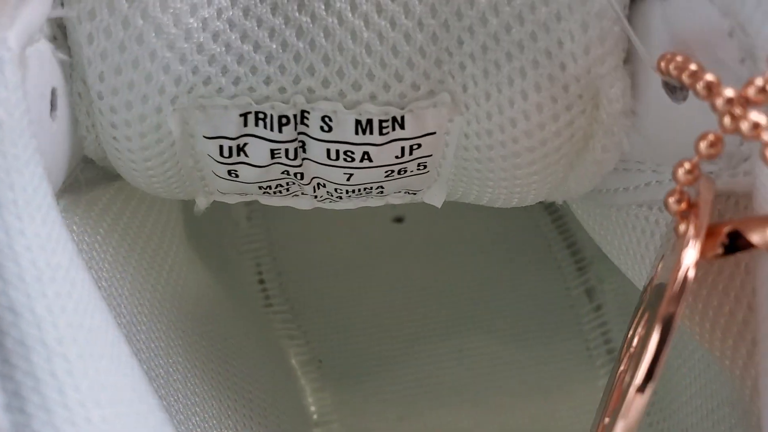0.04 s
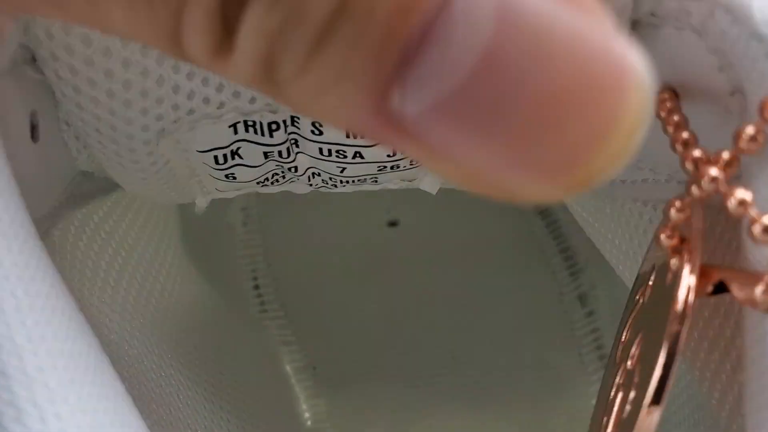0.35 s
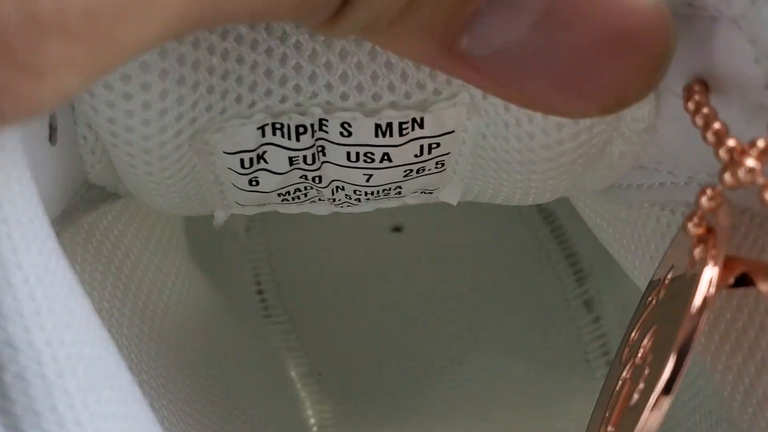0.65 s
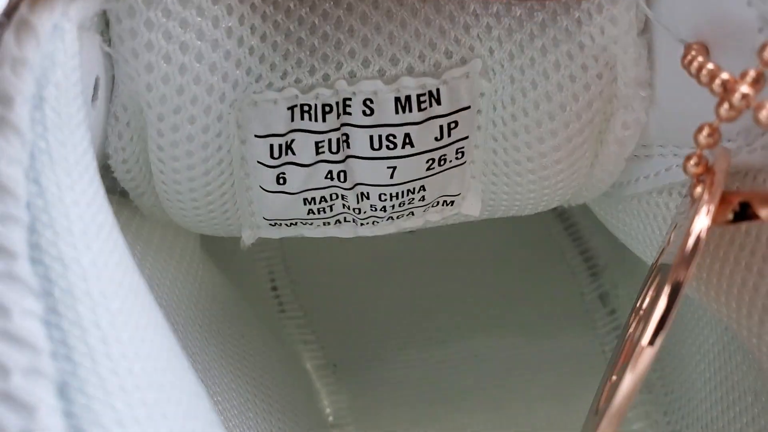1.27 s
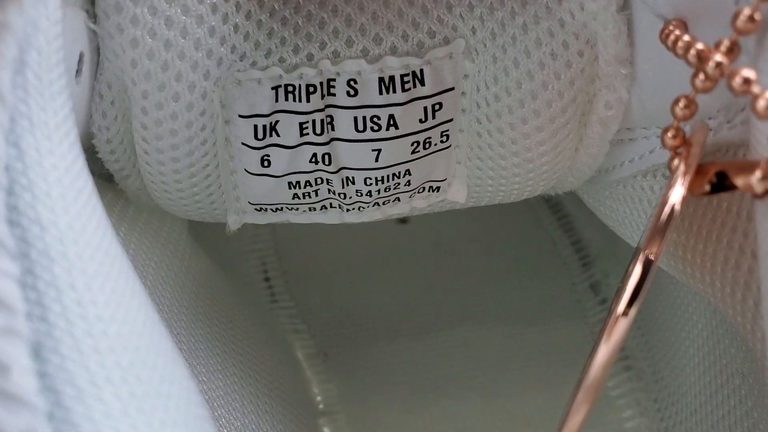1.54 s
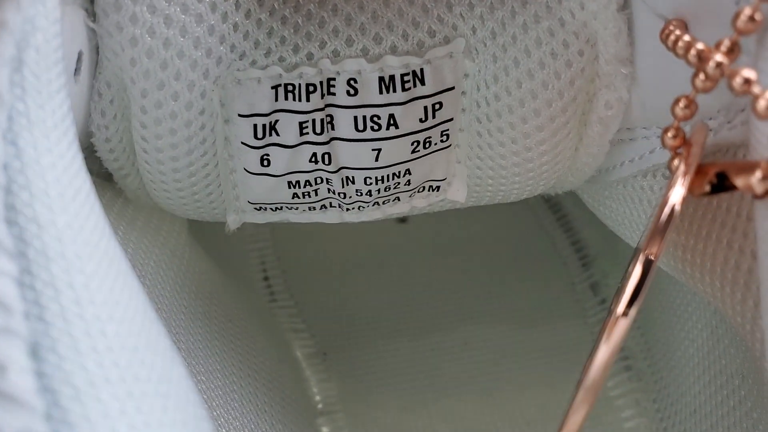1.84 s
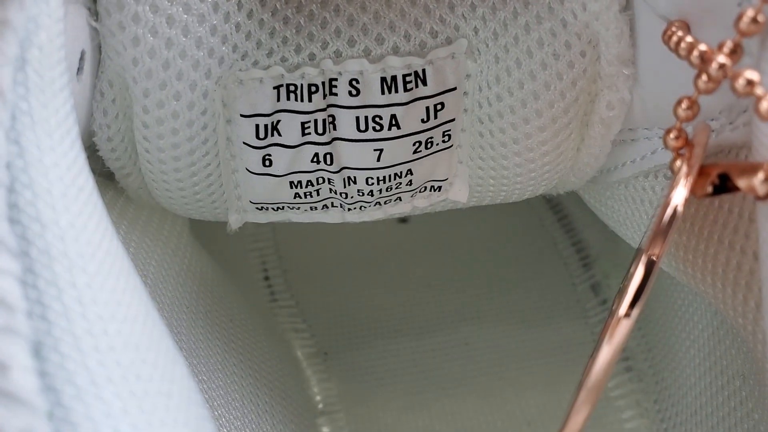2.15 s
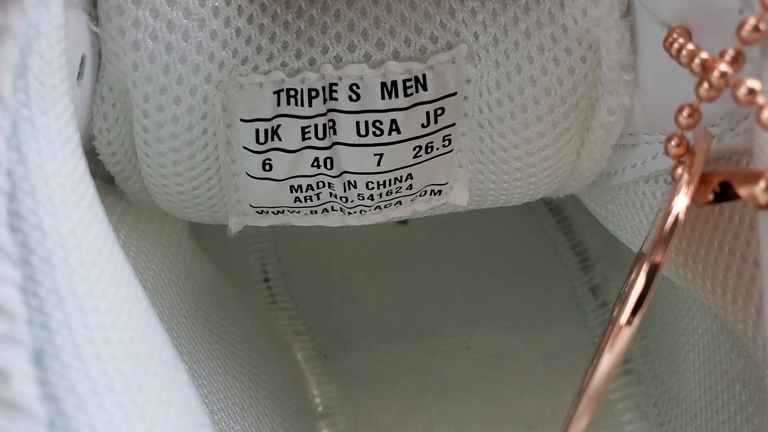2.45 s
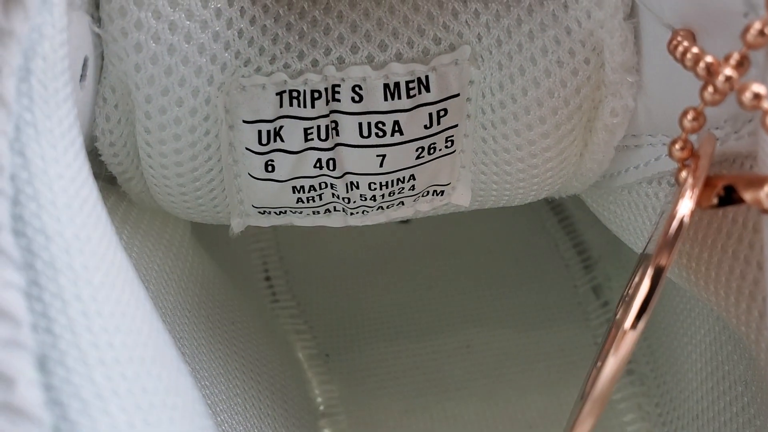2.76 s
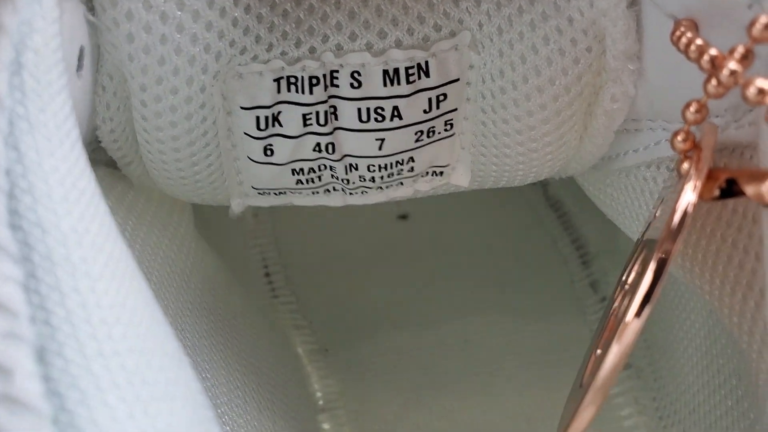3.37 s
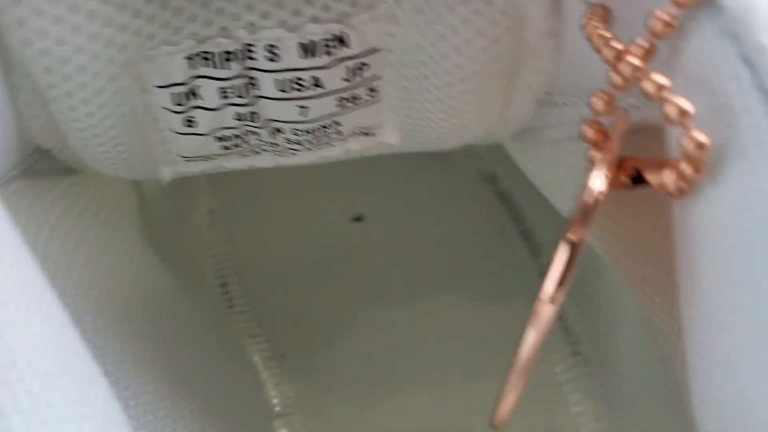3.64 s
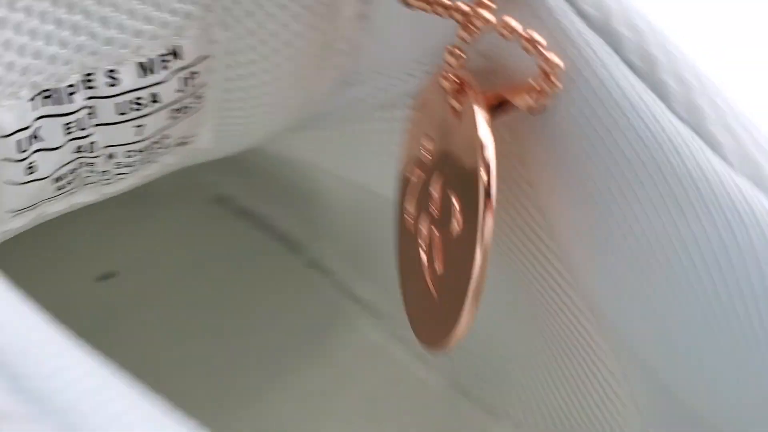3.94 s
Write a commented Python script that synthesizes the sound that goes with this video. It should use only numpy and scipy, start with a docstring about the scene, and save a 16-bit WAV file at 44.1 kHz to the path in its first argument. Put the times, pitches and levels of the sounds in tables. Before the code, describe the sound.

A fabric trainer rubs and rustles unevenly right beside the microphone, hissy over a low handling rumble. In the first second, fingers tap on the left and zip across mesh. After a lull near 1.6 seconds the strokes return, with a dull thud at 2.2. The strongest stroke comes at 3.4 with deep thuds, and another starts near 4. The quiet room hums faintly.

```python
"""A quiet room with a faint hum; a fabric trainer is turned right next to a hand-held camera's stereo mics.
From the start cloth slides in uneven strokes: a hiss of catching fibres over a dull rub and low rumble.
In the first second fingers tap the camera body by the left mic, and a finger zips across the mesh.
After a lull near 1.6 s the strokes return; a shift of the grip thuds at 2.2 s and fainter zips follow.
The strongest stroke comes at 3.4 s, with deep thuds from the grip, and a last one starts near 4 s."""
import sys
import numpy as np
from scipy import signal
from scipy.fft import rfft, irfft
from scipy.io import wavfile
from scipy.ndimage import uniform_filter1d

SR = 44100
rng = np.random.default_rng(int(sys.argv[2]) if len(sys.argv) > 2 else 0)


def unload_audio(sound):
    """Save the sound as a 16-bit wav file, at the path given as the first command line argument."""
    columns = np.transpose(np.atleast_2d(sound))
    # keep every value between -1 and 1, then stretch to whole-number steps
    steps = np.round(np.clip(columns, -1, 1) * 32767)
    wavfile.write(sys.argv[1], SR, steps.astype(np.int16))


N = 176400
T = np.arange(N) / SR


def amp(db):
    """Decibels to gain."""
    return 10 ** (np.asarray(db) / 20)


def unit(x):
    """Scales to rms 1."""
    return x / np.sqrt(np.mean(x ** 2) + 1e-20)


def db_at(spectrum, hz):
    """Reads a spectrum on a log-frequency axis."""
    freq_hz, level_db = np.transpose(spectrum)
    return np.interp(np.log(hz + 1), np.log(freq_hz + 1), level_db)


def colour(x, spectrum):
    """Gives x a spectrum, at rms 1."""
    gain = amp(db_at(spectrum, np.fft.rfftfreq(N, 1 / SR)))
    return unit(irfft(rfft(x) * gain, N))


def stereo_noise(correlation):
    """White noise at the left and right mics."""
    left, other = rng.standard_normal((2, N))
    return np.array([left, correlation * left + np.sqrt(1 - correlation ** 2) * other])


def wander(rate_hz):
    """Random drift of rms 1, mostly slower than rate_hz."""
    rolloff = 1 + (np.fft.rfftfreq(N, 1 / SR) / rate_hz) ** 4
    return unit(irfft(rfft(rng.standard_normal(N)) / rolloff, N))


def swell(peak_s, rise_s, hold_s, fade_s):
    """Climbs 20 dB in the rise_s before peak_s, rounds off, holds, then falls 20 dB per fade_s."""
    t = T - peak_s
    rising = (np.maximum(-t, 0) / rise_s) ** 1.5
    fading = np.maximum(t - hold_s, 0) / fade_s
    return amp(-20 * np.minimum(rising + fading, 10))


# Room tone: freq_hz, density_db
ROOM_SPECTRUM = [(20, -20), (60, 0), (120, -11), (250, -10), (450, -24.5), (1100, -27.5), (3000, -38.5),
                 (5500, -38), (8000, -44.5), (16000, -48.5)]
# Hum, equal at both mics: pitch_hz, level_db
HUM_TONES = [(60, -60), (240, -75), (1122, -90)]
def room_tone():
    """Still air in a quiet room, and a faint electrical hum."""
    hum = sum(amp(db) * np.sin(2 * np.pi * (hz * T + rng.random())) for hz, db in HUM_TONES)
    air = amp(-68) * colour(stereo_noise(correlation=.7), ROOM_SPECTRUM)
    return air + np.sqrt(2) * hum


# Handling rumble in the camera body: freq_hz, density_db
RUMBLE_SPECTRUM = [(15, -45), (35, -23), (55, -2), (82, 0), (110, -9), (150, -17), (240, -19), (450, -32),
                   (1500, -55), (16000, -80)]
def hand_rumble(rub_db):
    """The moving hand shakes the camera, rising and falling with the rub but less steeply."""
    usual_rub_db = -48
    level_db = -54.5 + .6 * (rub_db - usual_rub_db)
    return colour(stereo_noise(correlation=.75), RUMBLE_SPECTRUM) * amp(level_db)


# Thuds through the camera body, equal at both mics: peak_s, pitch_hz, level_db, rise_s, t60_s
GRIP_SHIFTS = [(.172, 70, -39, .03, .1), (.258, 262, -47, .02, .28), (.565, 56, -35.5, .015, .12),
               (1.105, 72, -45, .02, .1), (1.28, 68, -43, .03, .5), (1.265, 182, -44, .03, .35),
               (1.495, 64, -47, .02, .15), (2.212, 185, -27.5, .012, .1), (2.209, 265, -37, .008, .16),
               (2.225, 82, -41, .04, .4), (2.253, 160, -39, .012, .2), (2.397, 248, -40.5, .015, .28),
               (3.415, 235, -37, .03, .25), (3.476, 84, -27.5, .025, .52), (3.5, 60, -32, .025, .4),
               (3.62, 64, -36, .025, .27)]
def grip_thuds():
    """Each shift of the grip swells into a low, uneven ring."""
    out = np.zeros(N)
    for peak_s, pitch_hz, level_db, rise_s, t60_s in GRIP_SHIFTS:
        ring = np.sin(2 * np.pi * pitch_hz * (T - peak_s))
        rattle = 1 + .25 * wander(rate_hz=60)
        out += amp(level_db) * swell(peak_s, rise_s, 0, t60_s / 3) * ring * rattle
    return out


# Taps right beside the left mic: start_s, level_db, t60_ratio, attack_s
FINGER_TAPS = [(.5525, -23, .9, .003), (.5655, -23.5, 1.1, .001), (.8615, -27, .35, .001)]
# Modes of the camera case: pitch_hz, level_db, t60_s
CASE_MODES = [(185, -6, .05), (290, -1, .05), (420, -3, .04), (540, -14, .03), (980, -17, .02)]
def finger_taps():
    """Soft fingertips knock the damped modes of the camera case."""
    out = np.zeros(N)
    for start_s, level_db, t60_ratio, attack_s in FINGER_TAPS:
        t = np.maximum(T - start_s, 0)
        attack = 1 - np.exp(-t / attack_s)
        for pitch_hz, mode_db, t60_s in CASE_MODES:
            decay = amp(-60 * np.minimum(t / (t60_s * t60_ratio), 10))
            out += amp(level_db + mode_db) * attack * decay * np.sin(2 * np.pi * pitch_hz * t)
    return out * amp([[0], [-9]])  # weaker at the right mic


# Short zips close to the mics: peak_s, rise_s, hold_s, fade_s, level_db
MESH_SKIMS = [(.585, .015, .02, .06, -54), (.7, .008, .008, .04, -53), (1.078, .012, .018, .07, -50),
              (2.58, .008, .012, .04, -63), (2.665, .015, .015, .05, -61), (2.788, .015, .012, .05, -55)]
# Resonances of the shoe's mesh: freq_hz, density_db
MESH_SPECTRUM = [(1000, -40), (4500, -16), (5800, 0), (7500, -13), (9000, -9), (10400, 1), (12500, -9),
                 (16000, -13)]
def mesh_zips():
    """A finger skims the mesh and makes it hiss in two high resonances."""
    envelope = sum(amp(level_db) * swell(*timing) for *timing, level_db in MESH_SKIMS)
    return colour(stereo_noise(correlation=-.08), MESH_SPECTRUM) * envelope


# Dull rub of the padded shoe, close up: freq_hz, density_db
RUB_SPECTRUM = [(30, -26), (120, -9), (178, 0), (245, 2.5), (345, -9), (420, -5.5), (600, -8.5),
                (720, -6.5), (850, -11), (1120, -12), (1500, -22), (4000, -38), (16000, -60)]
def padded_rub(rub_db):
    """Slipping fibres heard through the padding, dull and nearly alike at both mics."""
    sides_db = np.array([[1.3], [-1.3]])  # a little to the left
    return colour(stereo_noise(correlation=.85), RUB_SPECTRUM) * amp(rub_db - 5.6 + sides_db)


# Fibre hiss, close up: freq_hz, density_db
HISS_SPECTRUM = [(100, -25), (400, -7.5), (1000, -1.8), (1400, -1), (2000, -.7), (2800, .6), (4000, .2),
                 (5200, -4.3), (7000, -8.8), (8500, -8.3), (10200, -3.8), (12000, -8.8), (15500, -11)]
# Its balance between the mics: freq_hz, left_minus_right_db
HISS_PAN = [(60, -2.0), (92, -2.5), (140, 0.0), (210, 0.5), (330, 1.0), (500, 2.0), (770, 3.0), (1170, 2.5),
            (1790, 1.5), (2740, 0.5), (4190, -0.5), (6410, 4.0), (9810, -2.5), (15000, -1.0)]
def fibre_hiss(stroke_db, tilt_db_per_octave, snags_per_s=1500, pivot_hz=4000):
    """Countless tiny slips and a few larger snags, in drifting patches of colour."""
    snag_onsets = rng.random(N) < snags_per_s / SR
    snags = snag_onsets * amp(2.5 * np.minimum(rng.exponential(1, N), 4))
    slips = stereo_noise(correlation=-.08) + amp(-9.5) * unit(snags * rng.standard_normal((2, N)))
    frames = dict(fs=SR, nperseg=512, noverlap=384)
    hz, frame_s, spectra = signal.stft(colour(slips, HISS_SPECTRUM), **frames)
    patches = rng.standard_normal(spectra.shape[1:])
    for axis in (0, 1):  # smooth over frequency, then time
        patches = uniform_filter1d(patches, size=12, axis=axis)
    octaves = np.log2(np.maximum(hz, 500) / pivot_hz)[:, None]
    tilt_db = octaves * np.interp(frame_s, T, tilt_db_per_octave)
    sides_db = np.array([.5, -.5])[:, None, None] * db_at(HISS_PAN, hz)[:, None]
    _, hiss = signal.istft(spectra * amp(tilt_db + 1.3 * unit(patches) + sides_db), **frames)
    flutter_db = .8 * wander(rate_hz=70)
    return hiss[:, :N] * amp(stroke_db + 3 + flutter_db)


# Strokes of cloth right at the mics:
# peak_s, rise_s, hold_s, fade_s, level_db, tilt_db_per_octave, rub_offset_db
CLOTH_STROKES = [(0.015, 0.03, 0.024, 0.101, -57.9, -1.1, -7.9),
                 (0.161, 0.048, 0.098, 0.103, -67.8, 0.2, 11.3),
                 (0.29, 0.056, 0.062, 0.187, -44.0, 0.4, 2.7),
                 (0.352, 0.054, 0.015, 0.091, -40.8, 1.5, -4.8),
                 (0.499, 0.06, 0.125, 0.119, -50.4, 0.4, 3.0),
                 (0.701, 0.021, 0.075, 0.221, -51.5, 1.8, -0.5),
                 (0.868, 0.257, 0.057, 0.319, -54.8, -2.7, 3.8),
                 (0.972, 0.048, 0.025, 0.127, -51.8, -0.1, -2.3),
                 (1.09, 0.092, 0.027, 0.103, -58.5, -0.0, 5.5),
                 (1.192, 0.071, 0.036, 0.151, -48.5, -1.1, 0.8),
                 (1.251, 0.027, 0.03, 0.15, -42.2, -0.7, 2.0),
                 (1.414, 0.127, 0.045, 0.104, -58.6, -0.9, 4.1),
                 (1.636, 0.018, 0.029, 0.075, -78.2, -1.9, -1.3),
                 (1.72, 0.015, 0.024, 0.101, -48.0, -0.3, -8.8),
                 (1.764, 0.037, 0.022, 0.124, -36.2, -0.2, -5.9),
                 (1.851, 0.046, 0.029, 0.129, -44.3, -0.9, -5.7),
                 (1.986, 0.029, 0.049, 0.314, -50.5, -0.3, -3.0),
                 (2.189, 0.095, 0.076, 0.139, -45.3, -0.3, 1.8),
                 (2.392, 0.039, 0.014, 0.183, -53.4, 0.6, 4.5),
                 (2.588, 0.047, 0.072, 0.206, -61.7, -0.5, -2.3),
                 (2.721, 0.078, 0.073, 0.14, -47.8, -0.2, -2.8),
                 (2.867, 0.033, 0.068, 0.207, -51.8, 0.6, -2.9),
                 (3.008, 0.087, 0.087, 0.166, -37.1, 0.2, 1.8),
                 (3.239, 0.134, 0.024, 0.396, -48.1, 0.5, 1.4),
                 (3.425, 0.055, 0.035, 0.109, -31.7, 0.5, 2.5),
                 (3.556, 0.068, 0.024, 0.249, -45.1, -0.5, 2.1),
                 (3.696, 0.034, 0.126, 0.057, -54.3, -1.4, 0.3),
                 (3.966, 0.045, 0.05, 0.15, -42.2, 2.0, -3.8)]
def cloth_strokes():
    """Overlapping slides add in power, giving the stroke level, treble tilt and rub level over time."""
    power = np.array([(amp(db) * swell(*timing)) ** 2 for *timing, db, _, _ in CLOTH_STROKES]) + 1e-14
    tilts, rub_offsets_db = np.transpose(CLOTH_STROKES)[-2:]
    total_power = power.sum(0)
    rub_power = amp(rub_offsets_db) ** 2 @ power
    return 10 * np.log10(total_power), tilts @ power / total_power, 10 * np.log10(rub_power)


def close_echoes(x, decay_s=.012, echo_db=-10):
    """Quick echoes off the shoe, hands and table give each mic its own fine colour."""
    t = T[:SR // 16]
    response = rng.standard_normal((2, len(t))) * np.exp(-t / decay_s) * (t > .001)
    response /= np.linalg.norm(response, axis=1, keepdims=True)
    echoes = signal.fftconvolve(x, response, axes=1)[:, :N]
    return (x + amp(echo_db) * echoes) / np.hypot(1, amp(echo_db))


def scene():
    """The shoe close up, handling noise in the camera body, and the room behind."""
    stroke_db, tilt_db_per_octave, rub_db = cloth_strokes()
    shoe = fibre_hiss(stroke_db, tilt_db_per_octave) + padded_rub(rub_db) + mesh_zips()
    return close_echoes(shoe) + hand_rumble(rub_db) + grip_thuds() + finger_taps() + room_tone()


def record(dry):
    """The camera cuts off the highest treble."""
    cutoff_hz = 15850
    lowpass = signal.firwin(801, cutoff_hz, window=("kaiser", 9), fs=SR)
    return signal.oaconvolve(dry, lowpass[None], "same")


dry = scene()
out = record(dry)
unload_audio(out)
```